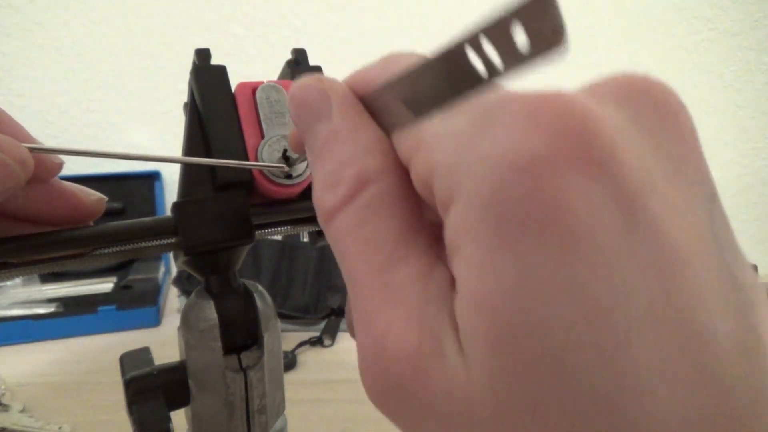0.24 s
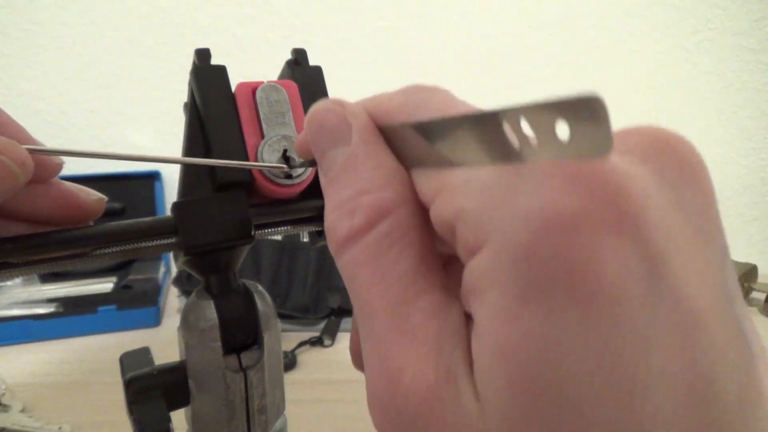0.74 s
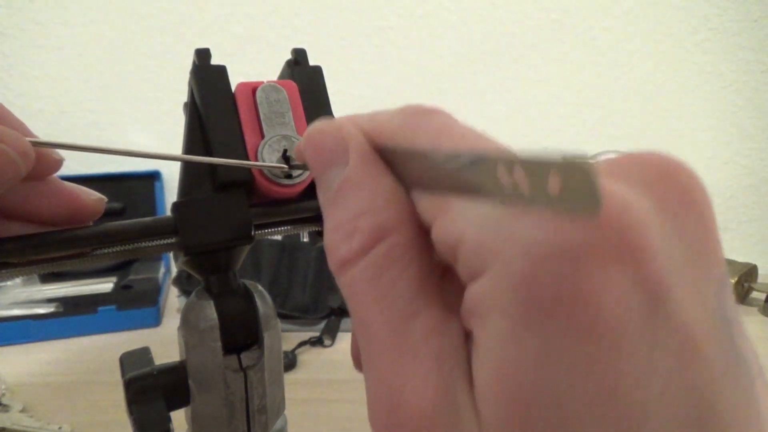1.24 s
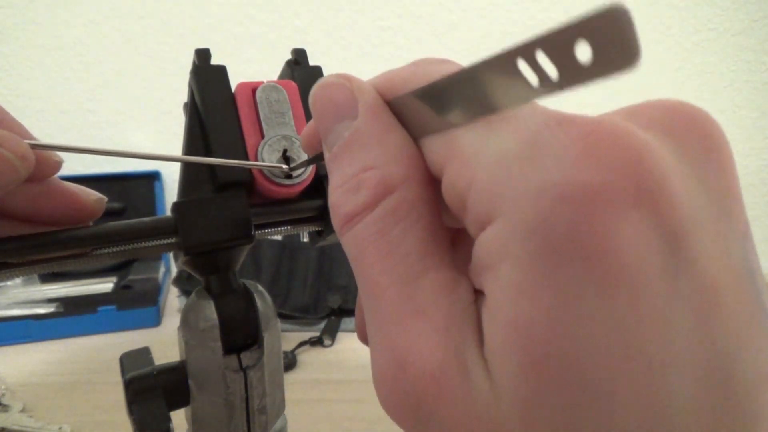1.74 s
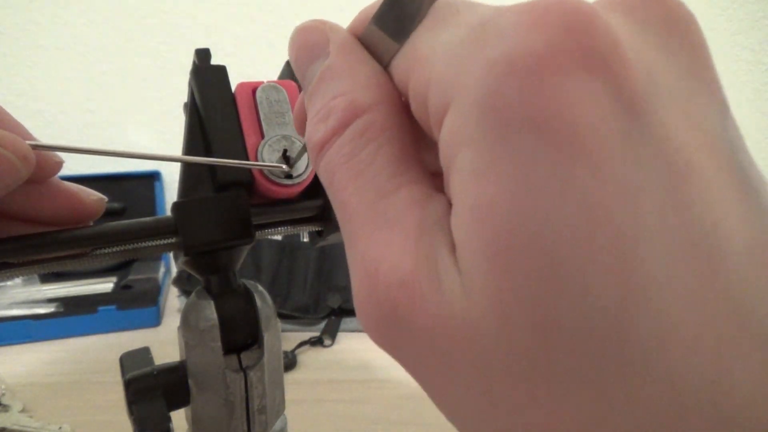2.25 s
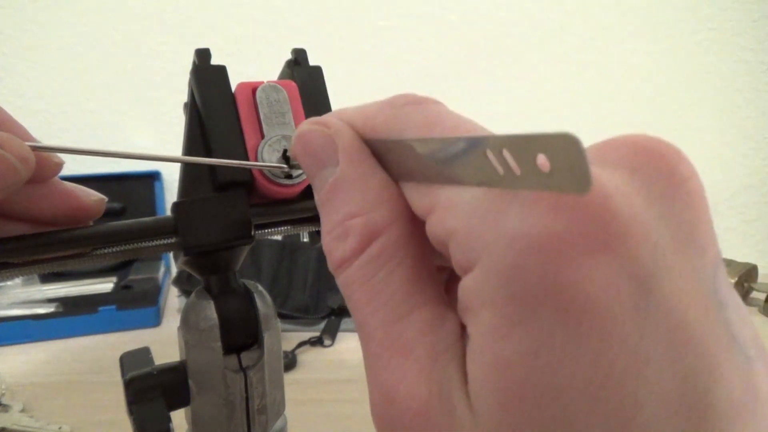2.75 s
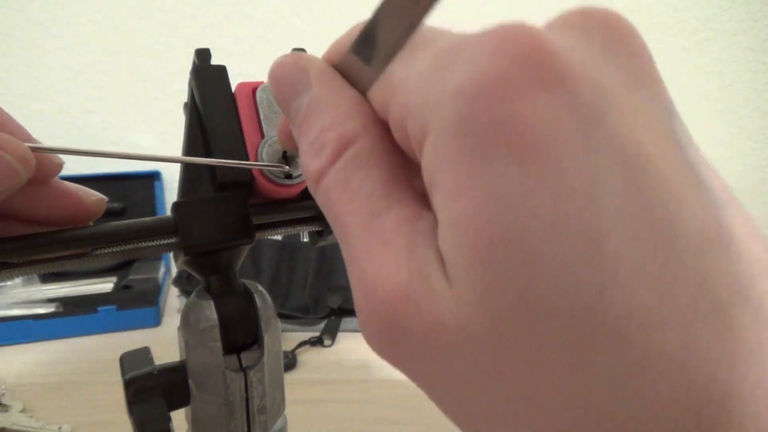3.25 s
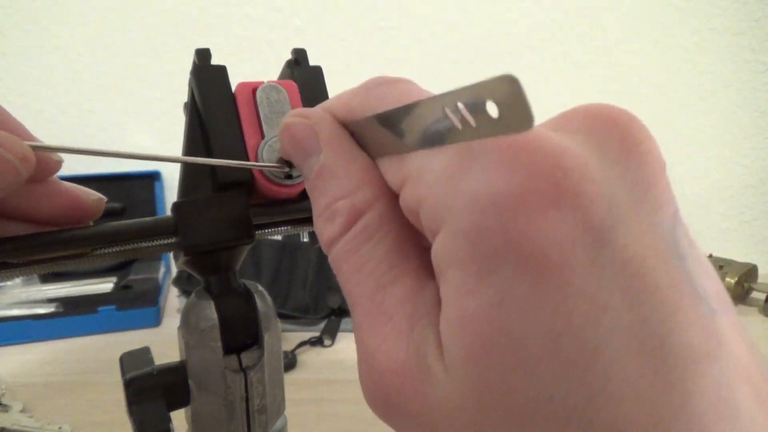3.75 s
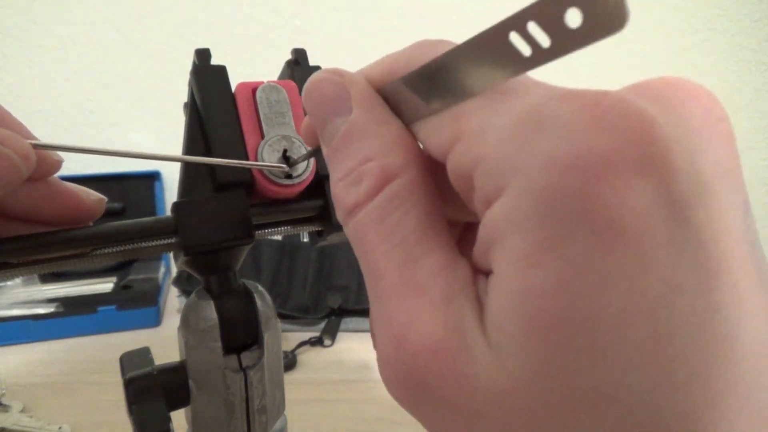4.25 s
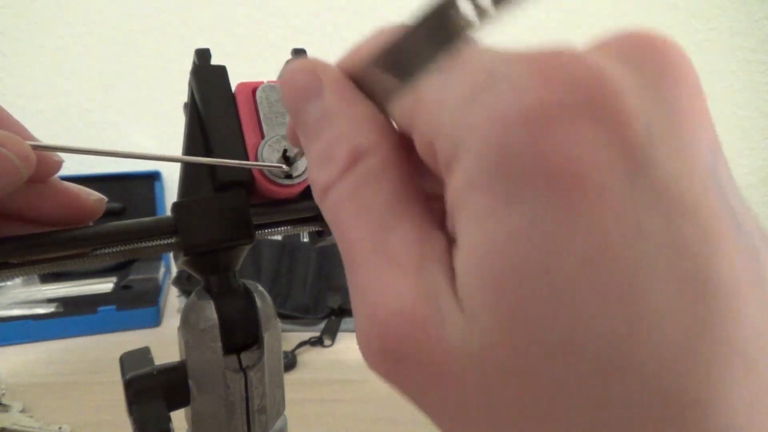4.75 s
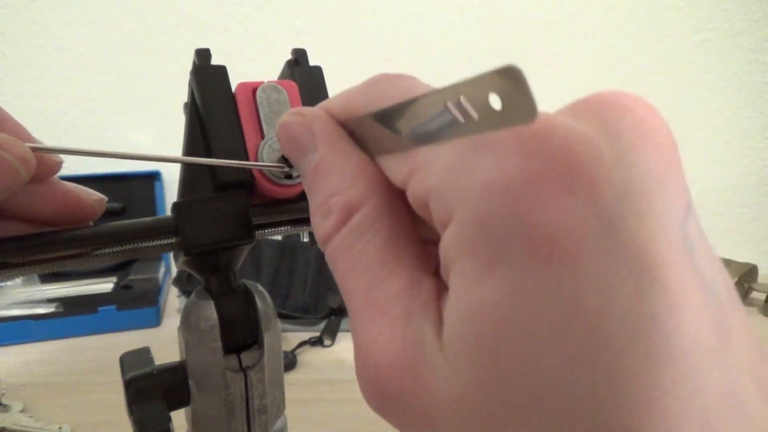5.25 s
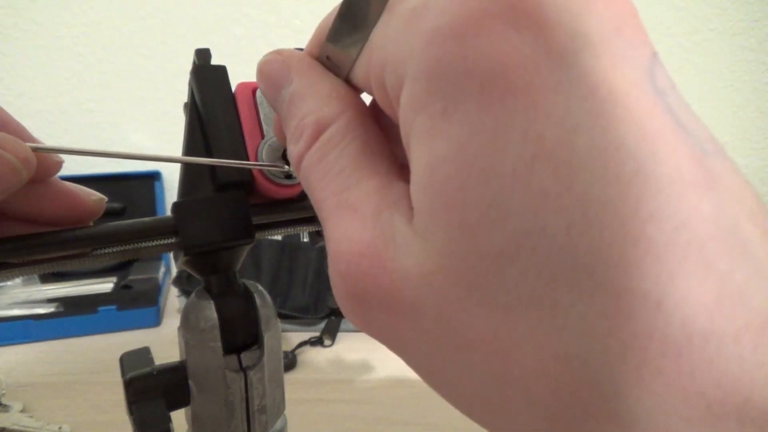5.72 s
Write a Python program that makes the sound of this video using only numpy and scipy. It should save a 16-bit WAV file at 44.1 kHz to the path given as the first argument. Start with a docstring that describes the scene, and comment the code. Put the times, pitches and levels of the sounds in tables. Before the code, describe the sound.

Irregular lock picking on a desk: a snap, a brighter double clack near one second, then quiet clicks and a duller thunk, a strong crunching clack at mid-clip, more faint scratching, and two final snaps. Each is short and dry, with a woody, metallic knock and a little small-room reverberation. Close, nearly central stereo microphone, with soft air noise and faint camera whine.

```python
"""A steel pick works the pins of a cylinder lock clamped in a vise on a desk, close to a camera in a small room.
Contacts are shaped noise ticks plus decaying vise and desk modes; random slips drive the same modes as a drag.
When the pick slips off a binding pin it cracks, twangs, rings the lock body and rebounds.
Beneath: sine mains hum, filtered air noise and hiss, and the camera's thin, high line whine, narrow whir and pips."""
import sys
import numpy as np
from scipy import signal
from scipy.fft import rfft, irfft, next_fast_len
from scipy.io import wavfile
from scipy.ndimage import map_coordinates

SR = 44100
rng = np.random.default_rng(int(sys.argv[2]) if len(sys.argv) > 2 else 0)


def unload_wav(signal):
    """Save mono or channel-first audio to the path in sys.argv[1] as 16-bit WAV at rate SR, clipped to [-1, 1]."""
    wavfile.write(
        sys.argv[1],
        SR,
        np.round(np.clip(np.atleast_2d(signal).T, -1, 1) * 32767).astype(np.int16),
    )


N = 263718

# Mains lines: [f/Hz, level/dB rms]
MAINS_LINES = [(59.2, -58), (118.4, -61)]
# Room air and hiss spectrum, before scaling to the air level: [f/Hz, density/dB per Hz]
AIR_SPECTRUM = [(15, -64), (25, -68), (40, -7), (64, -11), (86, -15), (121, -4), (150, -14.5), (191, -8),
                (264, -15), (404, -11.5), (673, -24), (729, -18.5), (879, -19), (3260, -23.5),
                (15000, -29.5)]
# Camera noise bands: [centre f/Hz, -6 dB width/Hz, level/dB rms]
CAMERA_BANDS = [(4358, 310, -68), (8180, 990, -72.5)]
# Pick meets a pin, or a pin falls back; levels before gains: [t/s, steel tick/dB, knock/dB]
PIN_CONTACTS = [ (0.1289, -43, -49), (0.913, -40.5, -73), (.9462, -22, -32.5), (1.011, -36, -43),
                (1.359, -46, -55), (1.389, -38, -55), (1.697, -52.5, -47.5), (1.7738, -37.5, -50),
                (1.91, -55, -50), (2.1747, -42, -36.5), (2.232, -40, -43), (2.3090, -38.5, -49),
                (2.704, -69, -41.5), (2.797, -52, -44.5), (3.001, -38, -43.5), (3.047, -55, -46.5),
                (3.525, -36, -68), (3.5562, -19, -23), (3.682, -56, -46), (3.925, -40.5, -45.5),
                (4.044, -43.5, -53.5), (4.343, -48.5, -51), (4.497, -51.5, -52.5), (4.675, -62, -51),
                (4.908, -50.5, -47.5), (5.0931, -41.5, -43), (5.1816, -57, -45.5), (5.2127, -40.5, -36.5),
                (5.435, -62, -37), (5.911, -72, -48.5)]
# Strokes of the pick over the pins, brief or long: [start t/s, end t/s, peak slip level/dB]
PICK_STROKES = [(0.68, 0.766, -58), (2.568, 2.647, -47), (2.922, 3.108, -55), (3.548, 3.664, -31.5),
                (3.735, 3.967, -51), (4.805, 4.932, -56.5), (5.032, 5.176, -46), (5.172, 5.29, -45.5),
                (5.422, 5.445, -40)]
# Lock, vise and desk ringing together; bass, scatter and sustain come on top: [f/Hz, level/dB, base t60/s]
VISE_MODES = [(125.7, -11, 0.17), (164.5, -1.5, 0.02), (210.6, -3.5, 0.067), (237, -1.5, 0.034),
              (319, -15, 0.13), (416.3, -16, 0.11), (499, -9.5, 0.036), (625, -6, 0.034),
              (736.5, -5, 0.045), (869, 1, 0.027), (1053.6, 4, 0.029), (1195, -0.5, 0.027),
              (1506, -8, 0.033), (1883, -2, 0.017)]
# Steel-on-brass tick colour, before tilt: [f/Hz, level/dB]
STEEL_COLOUR = [(700, -5), (2000, -8), (3500, -5.5), (5000, -9), (6400, -1), (7300, -3.5), (8500, -0.5),
                (9500, -2.5), (11300, 1), (12600, -0.5), (14000, -5.5), (16000, -25)]
# Pick slips off a binding pin, springs free and rebounds; levels before gains:
# [t/s, steel tick/dB, tick t60/s, tick tilt/dB per octave, knock/dB, extra bass/dB, hardness f/Hz,
#  pick ring f/Hz, pick ring/dB, clang f/Hz, clang/dB, first flight/s, rebound tick/dB, rebound knock/dB]
PIN_SNAPS = [ (0.306, -19.5, 0.02, 1.5, -28, -1, 720, 220, -18, 2870, -44.5, 0.0029, -41, -39),
             (0.954, -13, 0.016, -1.5, -22, 1, 1600, 1020, -13.5, 1430, -25.5, 0.01, -44, -38.5),
             (2.629, -31.5, 0.03, -6.5, -28, -4, 920, 244, -16, 1870, -40.5, 0.0051, -33.5, -38.5),
             (3.5537, -14.5, 0.012, 1.5, -19.5, 10, 1700, 460, -23.5, 1830, -24.5, 0.025, -26, -28),
             (5.4724, -21, 0.015, 1, -23, 0.5, 1270, 415, -15.5, 2380, -43, 0.0087, -54, -35.5),
             (5.8601, -26, 0.034, 2, -36.5, -6, 800, 198, -22, 2200, -60, 0.0066, -36, -47)]
# Lock body and wrench, woken only by hard blows; scatter comes on top: [f/Hz, level/dB, t60/s]
LOCK_MODES = [(1355, 5, 0.037), (1443, 0.5, 0.044), (1547, 5, 0.036), (1902, 3.5, 0.028), (2040, 2, 0.03),
              (2340, -8, 0.074), (2535, -1, 0.039), (2647, -3.5, 0.032), (2930, -10, 0.035), (3070, 7, .02)]
# Room decay: [f/Hz, t60/s]
ROOM_DECAY = [(100, 0.56), (300, 0.45), (1100, 0.5), (2600, 0.58), (5000, 0.55), (12000, 0.41)]
# Room answer, before the room level: [f/Hz, level/dB]
ROOM_ANSWER = [(100, -10.5), (400, -2.5), (1100, -5), (2600, -5), (5000, -13.5), (12000, -21)]
# Room answer, side relative to mid: [f/Hz, level/dB]
ROOM_SIDE = [(100, 1.5), (300, -36), (1000, -12), (2400, -44), (8000, 5), (13000, -50)]
# Port balance: [f/Hz, left minus right/dB]
PORT_BALANCE = [(60, 8), (120, 4.2), (250, 1.8), (600, 3.3), (1100, -1), (2200, -.4), (4500, .5)]

# A louder tick means a harder contact: hardness at the reference tick, and the dB that double it
HARD_HZ, HARD_TICK_DB, HARD_DOUBLING_DB = 1200, -39, 23
BASS_DB, BASS_SCATTER_DB = -1, 6.5  # contact bass varies with the spot touched
REBOUNDS, REBOUND_SHRINK, REBOUND_LOSS_DB = 3, 0.9, 5  # count, flight ratio, loss per rebound
WHINE_HZ, WHINE_DEPTH = 15734, 0.25
FRAME_HZ, PIP_WIDTH_S = 29.97, 0.002
TOP_HZ = 16300


def amp(db):
    """Decibels to gain."""
    return 10 ** (np.asarray(db) / 20)


def unit(x):
    """Scale to rms 1."""
    return x / np.sqrt(np.mean(x ** 2) + 1e-20)


def along(points, hz):
    """Interpolate (f/Hz, value) points on a log frequency axis."""
    f, v = np.transpose(points)
    return np.interp(np.log(hz + 1), np.log(f + 1), v)


def filtered(x, response):
    """Multiply the spectrum of x by a response of frequency."""
    n = x.shape[-1]
    m = next_fast_len(n + 8192)  # padded against wrap-around
    spectrum = rfft(x, m) * response(np.fft.rfftfreq(m, 1 / SR))
    return irfft(spectrum, m)[..., :n]


def coloured(x, gain, size=4096):
    """Minimum-phase filter with the given gain over frequency, by folding the cepstrum."""
    gains = np.maximum(gain(np.fft.rfftfreq(size, 1 / SR)), 1e-6)
    cepstrum = irfft(np.log(gains))
    cepstrum[1:size // 2] *= 2
    cepstrum[size // 2 + 1:] = 0
    impulse = irfft(np.exp(rfft(cepstrum)))
    return signal.fftconvolve(x, impulse)[:len(x)]


def add(track, start_s, sound):
    """Mix a sound into the track at a time."""
    start = max(round(start_s * SR), 0)
    part = track[..., start:start + sound.shape[-1]]
    part += sound[..., :part.shape[-1]]


def ringing(t60_s, hz, strength, t):
    """Sum decaying sine modes; neighbouring modes swing against each other."""
    polarity = (-1) ** np.arange(len(hz))
    decay = amp(-60 * t / t60_s[:, None])
    return (strength * polarity) @ (np.sin(2 * np.pi * hz[:, None] * t) * decay)


def first_10_ms_unit(ring):
    """Scale to rms 1 over the first 10 ms."""
    return ring / np.sqrt(np.mean(ring[:SR // 100] ** 2))


def in_room(x, room_db, build_s=0.002, ports_db=-19, ports_samples=48):
    """A mono sound plus decaying noise as the room's answer; two close ports hear them almost alike."""
    hz, t, z = signal.stft(rng.standard_normal((2, SR // 2)), SR, nperseg=256)
    t60_s = np.maximum(along(ROOM_DECAY, hz), 0.02)[:, None]
    equal_energy = np.sqrt(2 * np.log(1000) / (t60_s * SR))
    level = amp(room_db + along(ROOM_ANSWER, hz))[:, None]
    fade = amp(-60 * t / t60_s) * equal_energy * level
    z[1] *= amp(along(ROOM_SIDE, hz))[:, None]
    tail = signal.istft(z * fade, SR, nperseg=256)[1]
    tail = tail * (1 - np.exp(-np.arange(tail.shape[1]) / SR / build_s))
    # the two ports hear each hit slightly differently
    tail[1, :ports_samples] += amp(ports_db) * rng.standard_normal(ports_samples) / np.sqrt(ports_samples)
    mid, side = signal.fftconvolve(x[None], tail, axes=1)[:, :len(x)]
    return x + mid + np.array([side, -side])


def background(air_db=-57.5, side_db=-11, side_hz=1200):
    """Room air with microphone hiss as shaped noise, and mains hum as steady sines."""
    t = np.arange(N) / SR
    mid, side = unit(filtered(rng.standard_normal((2, N)), lambda hz: amp(along(AIR_SPECTRUM, hz))))
    side = amp(side_db) * filtered(side, lambda hz: 1 / np.hypot(1, hz / side_hz))
    hum = np.zeros(N)
    for hz, db in MAINS_LINES:
        hum += amp(db) * np.sqrt(2) * np.sin(2 * np.pi * (hz * t + rng.random()))
    return amp(air_db) * np.array([mid + side, mid - side]) + hum


def camera(whine_db=-57, pulse_hz=11.5, unsteady_cycles=0.3, pip_db=-60.0, pip_hz=3200,
           pip_spread_hz=55, first_pip_s=0.0333):
    """The camera's thin, high line whine, its narrow whir and one tiny pip for each picture."""
    t = np.arange(N) / SR
    drift = map_coordinates(rng.standard_normal(SR // 20), [t * pulse_hz / 2])
    pulse = np.sin(2 * np.pi * (pulse_hz * t + unsteady_cycles * drift))  # the whine's level rises and falls
    whine = amp(whine_db) * (1 + WHINE_DEPTH * pulse) * np.sqrt(2) * np.sin(2 * np.pi * WHINE_HZ * t)

    whir = np.zeros(N)
    for hz, width_hz, db in CAMERA_BANDS:
        band = filtered(rng.standard_normal(N), lambda f: 1 / (1 + (2 * (f - hz) / width_hz) ** 2))
        whir += amp(db) * unit(band)

    picture, part = np.divmod((t - first_pip_s) * FRAME_HZ + 0.5, 1)
    since_s = (part - 0.5) / FRAME_HZ  # from the middle of the nearest pip
    pitch_hz = (pip_hz + pip_spread_hz * rng.standard_normal(N))[picture.astype(int)]
    pips = np.exp(-(since_s / PIP_WIDTH_S) ** 2) * np.sqrt(2) * np.sin(2 * np.pi * pitch_hz * since_s)
    return whine + whir + amp(pip_db) * pips


def knock(bass_db, hard_hz, attack_s=0.0057, sustain=0.62, scatter_db=3.0, bass_hz=330):
    """The vise's modes after one blow; a soft contact weakens the high ones."""
    t = np.arange(SR // 4) / SR
    hz, db, t60_s = np.transpose(VISE_MODES)
    bass = bass_db / (1 + (hz / bass_hz) ** 4)
    db = db + scatter_db * rng.standard_normal(len(hz)) + bass
    strength = amp(db) / np.hypot(1, (hz / hard_hz) ** 2)
    ring = ringing(sustain * t60_s, hz, strength, t)
    ring = ring * (1 - np.exp(-(t / attack_s) ** 2))  # the heavy vise takes a moment to get going
    return first_10_ms_unit(ring)


def tick(t60_s=0.042, tilt_db_per_octave=0, crack_db=5, crack_t60_s=0.00099,
         rattle_db=-18, rattle_t60_s=0.11, attack_s=0.000093):
    """Steel meets brass: a sharp crack, dense short-lived modes, a brief rattle of pins and springs, all as noise."""
    t = np.arange(SR // 8) / SR
    crack = amp(crack_db - 60 * t / crack_t60_s)
    modes = amp(-60 * t / t60_s)
    rattle = amp(rattle_db - 60 * t / rattle_t60_s)
    envelope = (crack + modes + rattle) * (1 - np.exp(-t / attack_s))

    def colour(hz):
        """Steel spectrum, tilted above 1 kHz."""
        return amp(along(STEEL_COLOUR, hz) + tilt_db_per_octave * np.log2(np.maximum(hz, 1000)))

    snap = coloured(envelope * rng.standard_normal(len(t)), colour)
    return snap / np.sqrt(np.sum(snap ** 2) / (SR / 1000))  # energy of 1 ms at rms 1


def drags(slips_per_s=420, resting_db=-64, grit_db=-20, hard_hz=1000, bass_db=-2, room_db=-5,
          slide_db=-17, lead_s=0.012, trail_s=0.038):
    """Tiny uneven slips shake the same modes: in strokes, in a slide around each contact, and faintly at rest."""
    t = np.arange(N) / SR
    pressure = np.full(N, amp(resting_db))
    slides = [(s - lead_s, s + trail_s, knock_db + slide_db) for s, _, knock_db in PIN_CONTACTS]
    for start_s, end_s, db in list(PICK_STROKES) + slides:
        during = (t > start_s) & (t < end_s)
        pressure[during] += amp(db) * np.sin(np.pi * (t[during] - start_s) / (end_s - start_s))
    slips = (rng.random(N) < slips_per_s / SR) * rng.standard_normal(N)
    slips = unit(slips) * pressure
    body, grit = knock(bass_db, hard_hz), tick()
    answer = body / np.linalg.norm(body)
    add(answer, 0, amp(grit_db) * grit / np.linalg.norm(grit))
    return in_room(signal.fftconvolve(slips, answer)[:N], room_db)


def touch(tick_db, knock_db, tick_gain_db=3.0, knock_gain_db=0.0, tick_t60_s=0.012, lag_s=0.00056):
    """One light contact: it ticks in the lock and nudges the vise into a round knock."""
    hard_hz = HARD_HZ * 2 ** ((tick_db - HARD_TICK_DB) / HARD_DOUBLING_DB)
    bass_db = BASS_DB + BASS_SCATTER_DB * rng.standard_normal()
    hit = np.zeros(SR // 2)
    add(hit, 0, amp(tick_db + tick_gain_db) * tick(tick_t60_s))
    add(hit, lag_s, amp(knock_db + knock_gain_db) * knock(bass_db, hard_hz, attack_s=0.004, sustain=1.09))
    return hit


def probing(count=16, tick_db=-60, knock_db=-59, scatter_db=4.5, room_db=-4):
    """The pick keeps feeling for the pins: faint touches at loosely even intervals."""
    out = np.zeros(N)
    times_s = (np.arange(count) + rng.random(count)) * N / SR / count
    forces_db = scatter_db * rng.standard_normal(count)
    for s, force_db in zip(times_s, forces_db):
        add(out, s, touch(tick_db + force_db, knock_db + force_db))
    return in_room(out, room_db)


def contacts(room_db=-4):
    """The clear contacts of pick and pins, each a tick and a knock."""
    out = np.zeros((2, N))
    for s, tick_db, knock_db in PIN_CONTACTS:
        add(out, s, in_room(touch(tick_db, knock_db), room_db))
    return out


def clang(centre_hz, octaves=0.7, attack_s=0.00098, scatter_db=1):
    """The lock body rings; the spot that is struck favours the modes around one pitch."""
    t = np.arange(SR // 6) / SR
    hz, db, t60_s = np.transpose(LOCK_MODES)
    favour = 1 / (1 + (np.log2(hz / centre_hz) / octaves) ** 2)
    strength = amp(db + scatter_db * rng.standard_normal(len(hz))) * favour
    ring = ringing(t60_s, hz, strength, t) * (1 - np.exp(-t / attack_s))
    return first_10_ms_unit(ring)


def twang(hz, t60_s=0.03, attack_s=0.0029):
    """The pick's own bending mode, damped by the fingers; its pitch depends on the free length."""
    t = np.arange(SR // 4) / SR
    return 2 * np.sin(2 * np.pi * hz * t) * amp(-60 * t / t60_s) * (1 - np.exp(-t / attack_s))


def rebounds(flight_s, tick_db, knock_db):
    """The freed pick bounces on the pins, each time sooner and weaker."""
    out = np.zeros(SR // 2)
    landings_s = np.cumsum(flight_s * REBOUND_SHRINK ** np.arange(REBOUNDS))
    for k, s in enumerate(landings_s):
        loss_db = k * REBOUND_LOSS_DB
        add(out, s, touch(tick_db - loss_db, knock_db - loss_db))
    return out


def snaps(tick_gain_db=2, knock_gain_db=-1.5, clang_gain_db=1, lag_s=0.0008, room_db=0, rebound_room_db=-4):
    """A freed pick cracks against the next pin, twangs, jolts lock and vise, and rebounds."""
    out = np.zeros((2, N))
    for (s, tick_db, tick_t60_s, tilt_db_per_octave, knock_db, bass_db, hard_hz,
         pick_hz, pick_db, clang_hz, clang_db, *bounce) in PIN_SNAPS:
        hit = np.zeros(SR // 2)
        add(hit, 0, amp(tick_db + tick_gain_db) * tick(tick_t60_s, tilt_db_per_octave))
        add(hit, 0, amp(clang_db + clang_gain_db) * clang(clang_hz))
        jolt = knock(bass_db, hard_hz, attack_s=0.0014, sustain=0.74)
        add(hit, lag_s, amp(knock_db + knock_gain_db) * jolt)
        add(hit, lag_s, amp(pick_db) * twang(pick_hz))
        add(out, s, in_room(hit, room_db) + in_room(rebounds(*bounce), rebound_room_db))
    return out


def scene(low_cut_hz=70):
    """The lock work, with its deep bass cut, over the quiet room."""
    work = drags() + probing() + contacts() + snaps()
    low_cut = signal.butter(2, low_cut_hz, "highpass", fs=SR, output="sos")
    return background() + camera() + signal.sosfilt(low_cut, work)


def record(dry):
    """Tilt the two ports' balance over frequency, the left one bassier; keep nothing above the band limit."""
    def balance(hz):
        """Half the difference up on the left, half down on the right."""
        lean_db = along(PORT_BALANCE, hz)
        return amp(np.array([lean_db, -lean_db]) / 2)

    leaning = filtered(dry, balance)
    return filtered(leaning, lambda hz: hz < TOP_HZ)


dry = scene()
out = record(dry)
unload_wav(out)
```